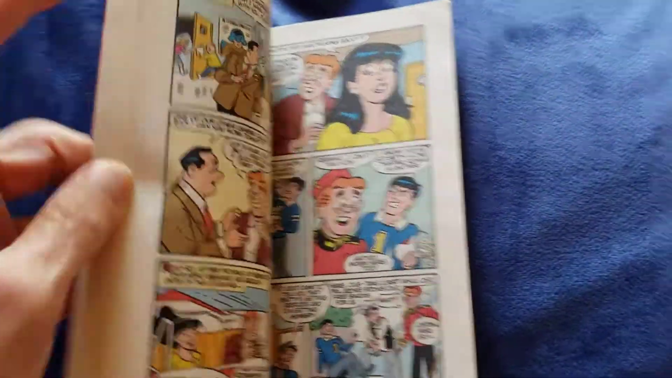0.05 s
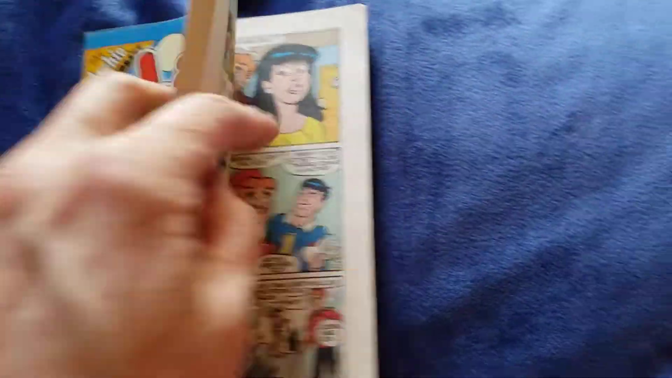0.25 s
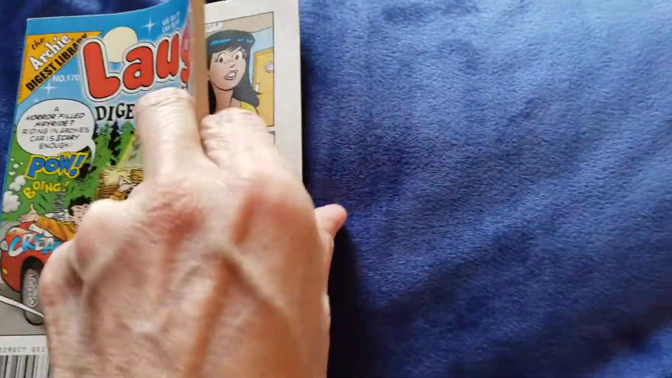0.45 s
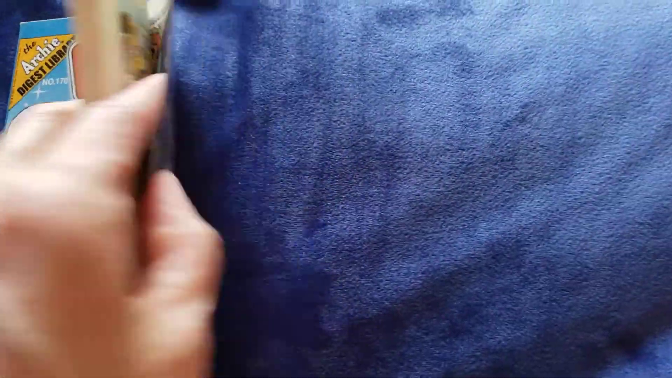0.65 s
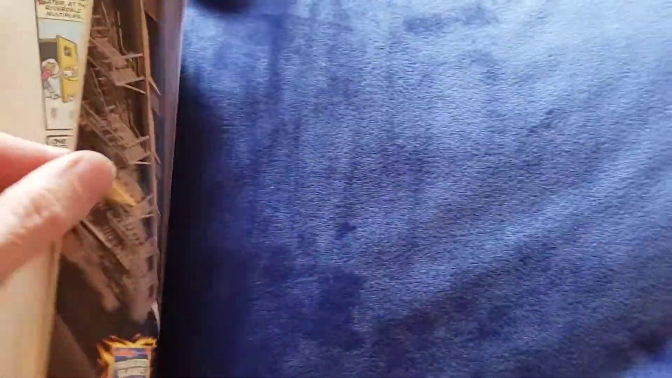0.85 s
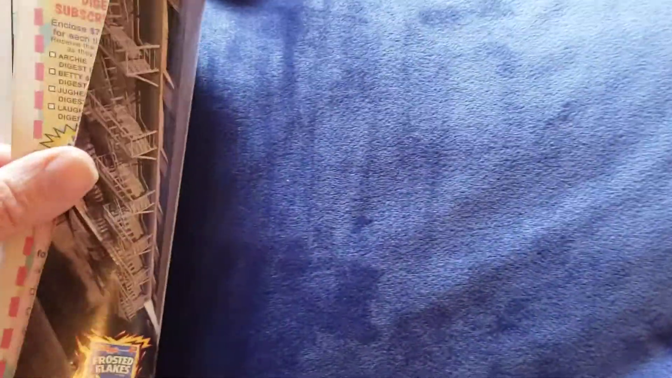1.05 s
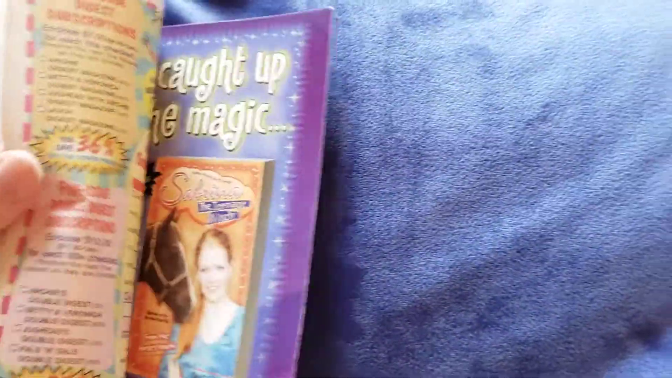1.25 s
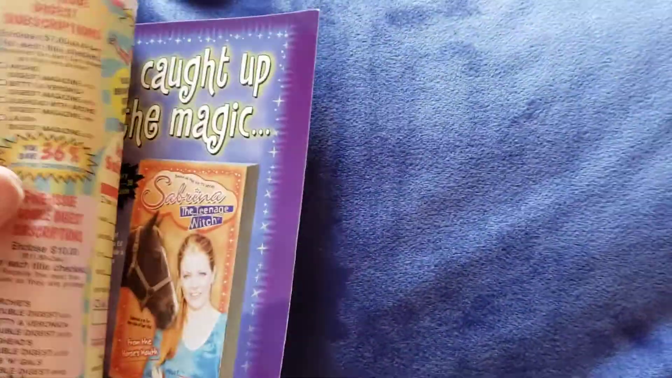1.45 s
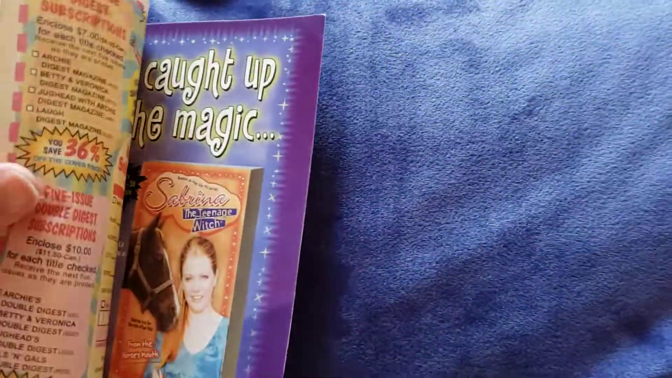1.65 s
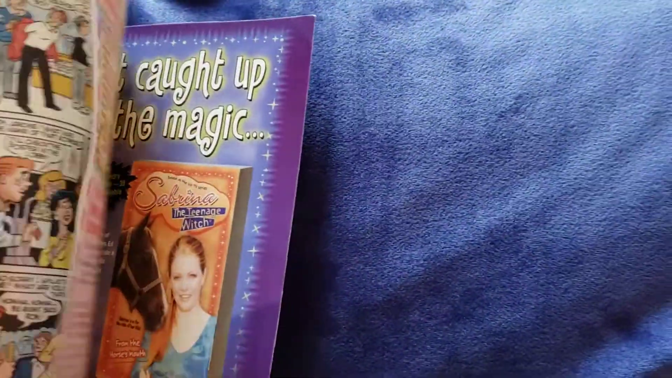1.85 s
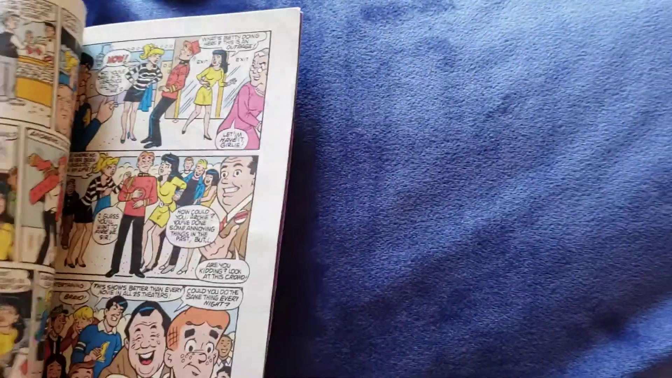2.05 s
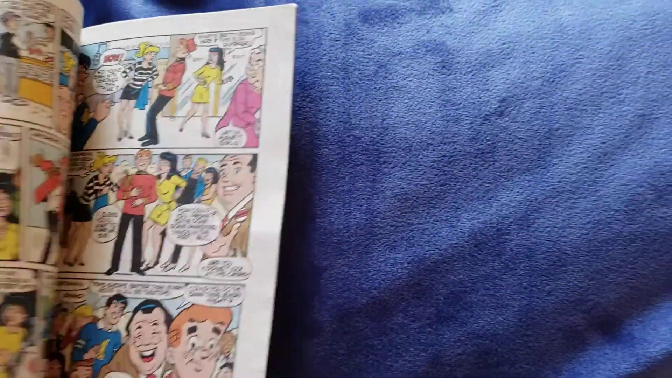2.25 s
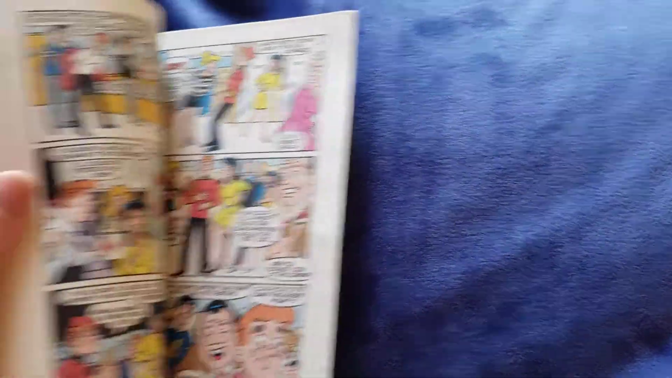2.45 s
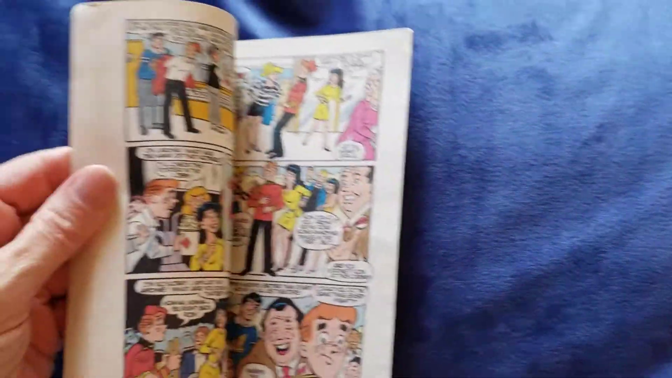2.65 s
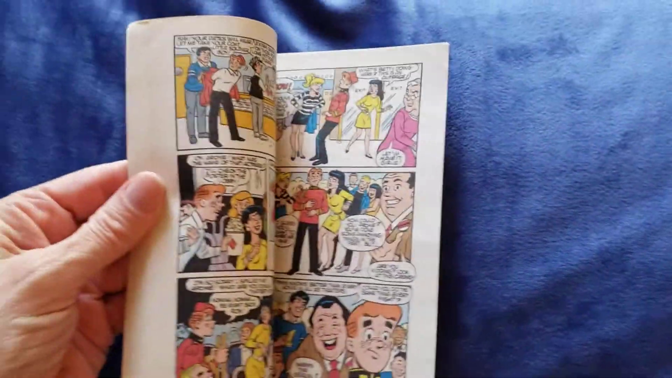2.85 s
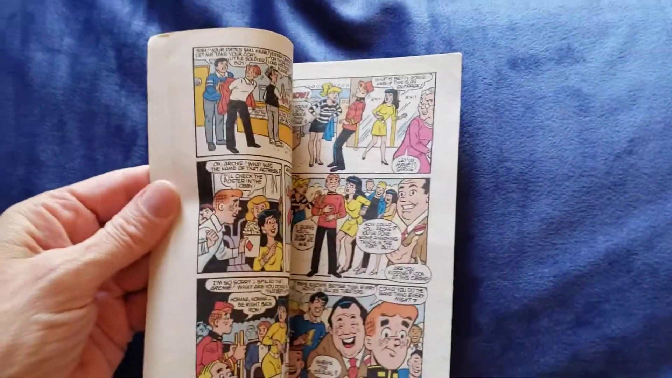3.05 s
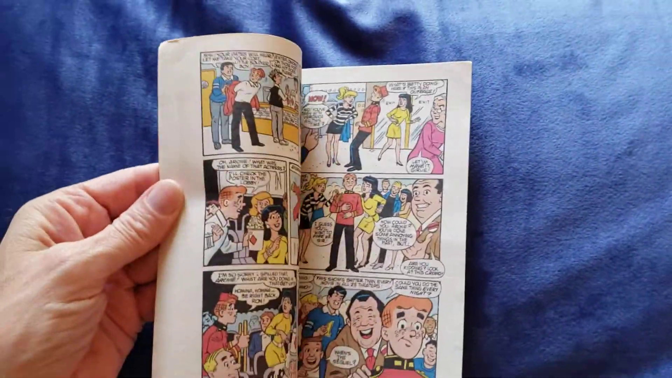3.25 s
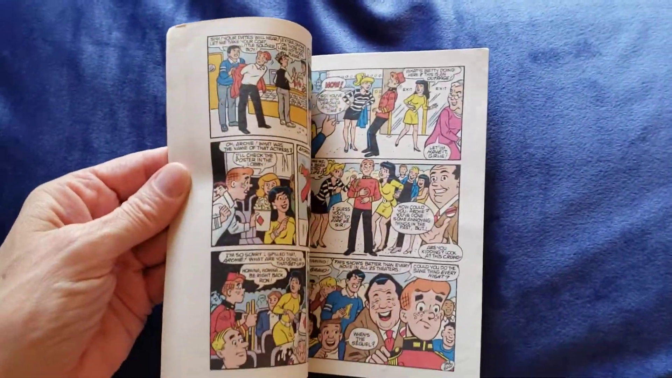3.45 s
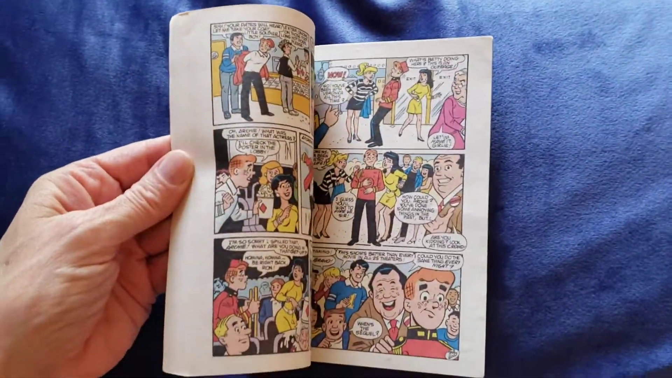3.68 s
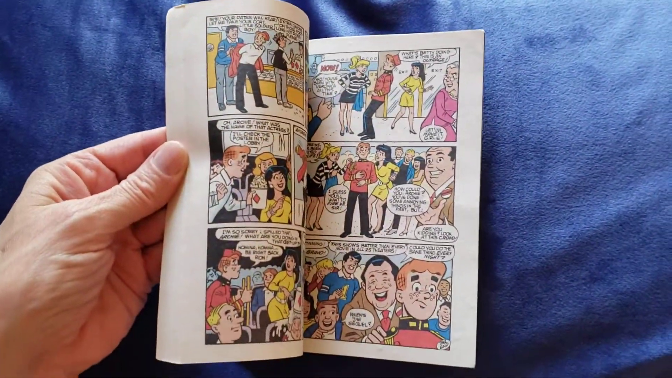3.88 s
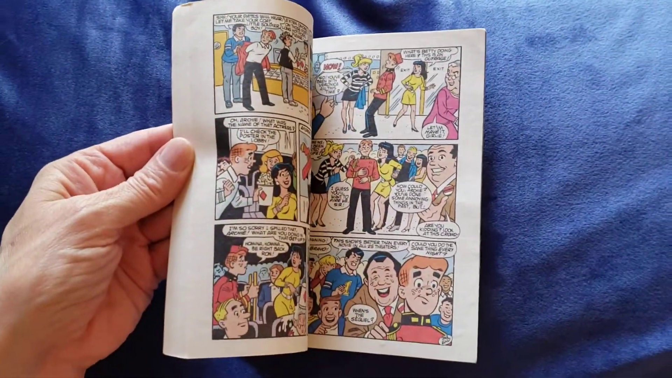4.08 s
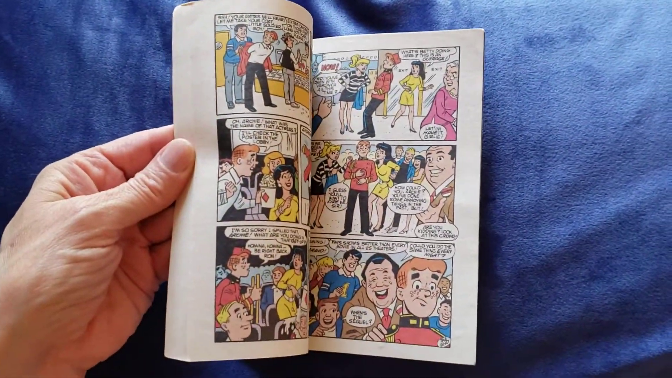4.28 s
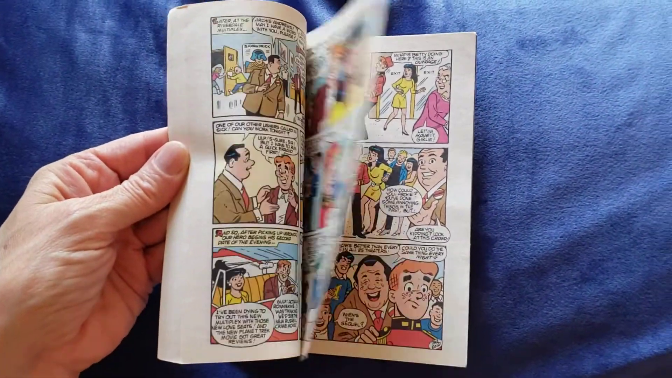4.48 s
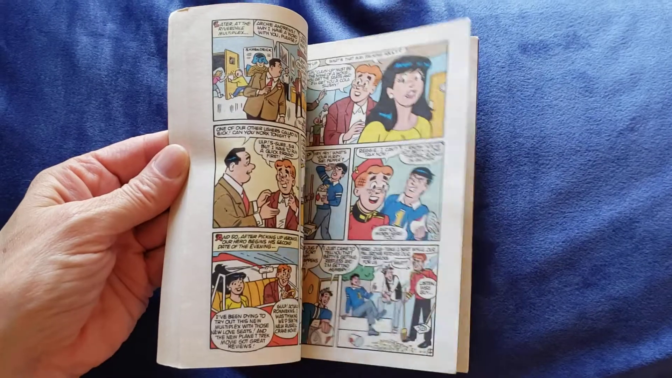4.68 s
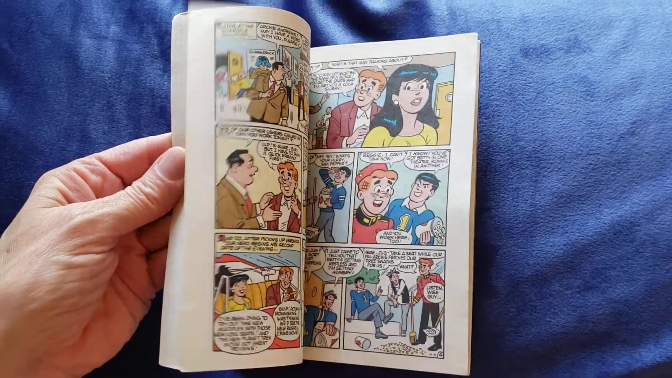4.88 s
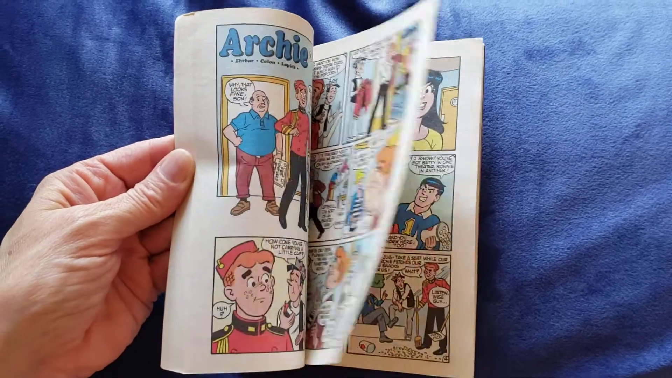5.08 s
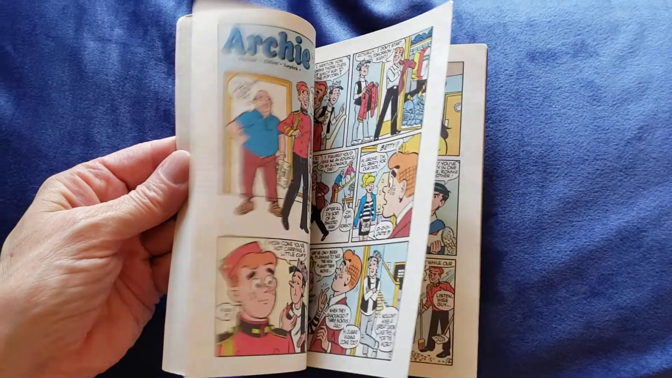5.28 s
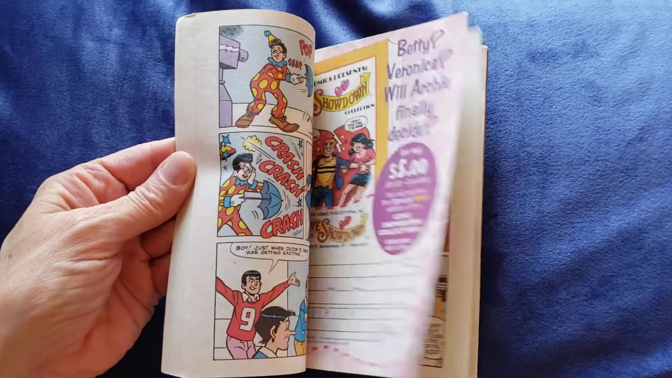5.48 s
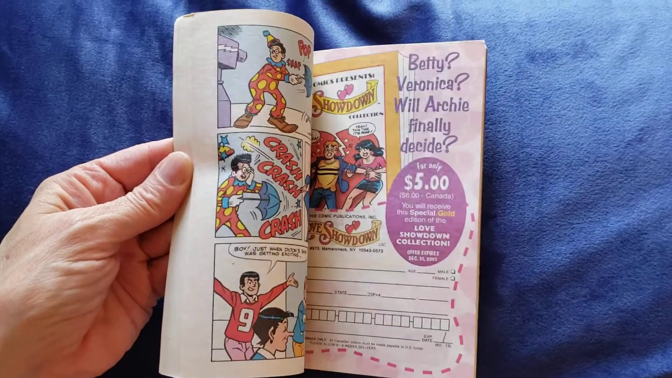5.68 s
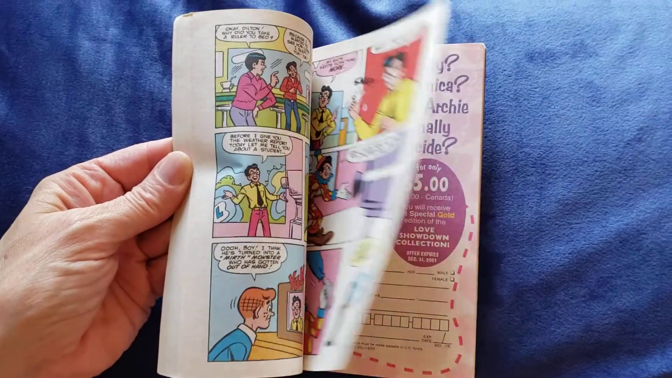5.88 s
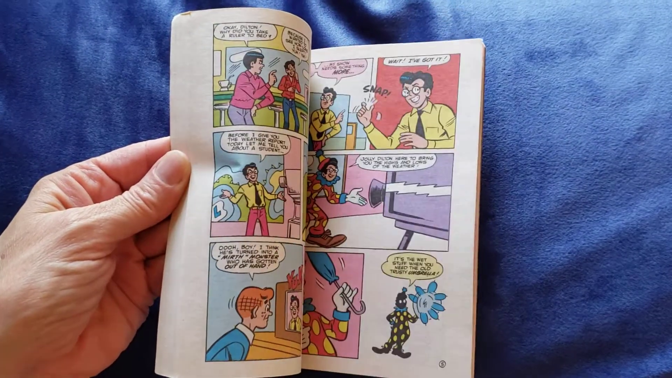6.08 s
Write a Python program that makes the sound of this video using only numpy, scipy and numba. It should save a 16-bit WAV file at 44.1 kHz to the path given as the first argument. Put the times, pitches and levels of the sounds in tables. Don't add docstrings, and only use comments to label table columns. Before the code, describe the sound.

Magazine pages are riffled and snapped close up for two seconds, then sparse soft page flicks over a quiet, faintly humming room.

```python
import sys
import numpy as np
from scipy import signal
from scipy.fft import rfft, irfft
from scipy.io import wavfile
from scipy.ndimage import uniform_filter1d
from numba import njit

SR = 44100
rng = np.random.default_rng(int(sys.argv[2]) if len(sys.argv) > 2 else 0)


def pcm_store(signal):
    levels = np.round(np.clip(np.atleast_2d(signal), -1, 1) * 32767)
    wavfile.write(sys.argv[1], SR, levels.astype(np.int16).T)


def voltage_ratio(level):
    return 10 ** (np.asarray(level, float) / 20)


N = 270333
TIME = np.arange(N) / SR
HZ = np.maximum(np.arange(N // 2 + 1) * SR / N, 1)
BELOW_HISS_TOP = HZ < 15850


def noise():
    return rng.standard_normal(N)


def unit(x):
    return x / np.sqrt(np.mean(x ** 2))


def band(x, lo_hz, hi_hz, order=2):
    low_edge = 1 + (lo_hz / HZ) ** (2 * order)
    high_edge = 1 + (HZ / hi_hz) ** (2 * order)
    return unit(irfft(rfft(x) * BELOW_HISS_TOP / np.sqrt(low_edge * high_edge), N))


def curves(rows):
    s, *columns = np.transpose(rows)
    return [np.interp(TIME, s, column) for column in columns]


def walk(rate_hz):
    hold = int(SR / rate_hz)
    steps = np.repeat(rng.standard_normal(N // hold + 1), hold)
    return unit(uniform_filter1d(steps, hold)[:N])


def pan(pan_db):
    return voltage_ratio(np.array([pan_db, -pan_db]) / 2)


@njit
def resonate(x, hz, sharp):
    y, b, l = np.empty(len(x)), 0., 0.
    for i in range(len(x)):
        g = np.tan(np.pi * hz[i] / SR)
        v = (b + g * (x[i] - l)) / (1 + g * (g + 1 / sharp))
        b, l, y[i] = 2 * v - b, l + 2 * g * v, v / sharp
    return y


def room_tone():
    # (frequency [Hz], density [dB per Hz])
    hiss_spectrum = [(25, -100), (45, -85), (90, -83.5), (160, -91), (240, -88), (400, -94.5), (560, -101),
                     (750, -107), (1500, -112), (2600, -117), (4500, -123), (8600, -131), (11000, -124),
                     (15000, -120)]
    hz, db = np.transpose(hiss_spectrum)
    colour = voltage_ratio(np.interp(np.log(HZ), np.log(hz), db)) * BELOW_HISS_TOP * np.sqrt(SR / 2)
    alike = .9 / (1 + (HZ / 600) ** 3)
    mid = rfft(noise()) * np.sqrt(1 + alike)
    side = rfft(noise()) * np.sqrt(1 - alike)
    both = np.array([irfft(colour * (mid + side), N), irfft(colour * (mid - side), N)])
    return both * voltage_ratio(np.array([[-4.2], [-1.8]]))


def hum():
    # (frequency [Hz], level [dB], left minus right [dB], wobble [dB])
    hum_lines = [(58.4, -54.5, 0, 0.85), (120, -62, 8.5, 1), (217.3, -78, 2.2, 5), (235, -71, -1, 3),
                 (262, -75.5, -1.4, 5)]
    # (frequency [Hz], level [dB])
    whine_lines = [(2480, -99), (3730, -99)]
    out = np.zeros((2, N))
    for hz, db, pan_db, wobble_db in hum_lines:
        phase = 2 * np.pi * hz * TIME + 0.36 * wobble_db * walk(6)
        line = np.sin(phase) * voltage_ratio(db + 2.5 + wobble_db * walk(9))
        out += line * pan(pan_db)[:, None]
    for hz, db in whine_lines:
        out += voltage_ratio(db) * np.sin(2 * np.pi * hz * TIME + rng.uniform(0, 6, (2, 1)))
    return out


def buffet():
    # (middle [s], level [dB], flutter [dB], half length [s])
    gusts = [(0.259, -52.5, -49.5, 0.027), (0.43, -60, -54.5, 0.11), (0.677, -66, -49, .03),
             (0.81, -54, -62, 0.078), (0.92, -51.5, -48, 0.055), (1.023, -55, -54.5, .04),
             (1.19, -69, -59, 0.056), (1.43, -64, -61.5, .06), (1.88, -69.5, -55.5, 0.043),
             (2.225, -70, -63, .05), (2.657, -64, -70.5, 0.022), (3.511, -57, -51.5, 0.027),
             (3.572, -46.5, -58.5, 0.017), (3.78, -53, -62, 0.11), (3.949, -54.5, -51.5, 0.029),
             (4.103, -61.5, -56, .04), (4.62, -62.5, -62.5, 0.082), (4.825, -61.5, -75, 0.059),
             (4.979, -57.5, -63, .05), (5.63, -54.5, -59, 0.025), (5.72, -54, -61, .03),
             (5.815, -58.5, -69, .03)]
    # (time [s], level [dB])
    left_rumble = [(0, -75), (.4, -77), (.48, -61), (.56, -76), (1.1, -69.5), (1.2, -50.5), (1.3, -65.5),
                   (1.7, -67.5), (6.13, -83.5)]
    deep_power, flutter_power = np.zeros(N), np.zeros(N)
    for s, db, flutter_db, half in gusts:
        lump = np.exp(-((TIME - s) / half) ** 2)
        deep_power += voltage_ratio(db + 10.5) ** 2 * lump
        flutter_power += voltage_ratio(flutter_db + 4) ** 2 * lump
    right = np.sqrt(deep_power) * band(noise(), 35, 80, order=4)
    right += np.sqrt(flutter_power) * band(noise(), 65, 115, order=4)
    left = voltage_ratio(curves(left_rumble)[0]) * band(noise(), 30, 70, order=4)
    smooth = signal.butter(4, 260, fs=SR, output="sos")
    return signal.sosfilt(smooth, np.array([left, right]))


def walls(x):
    t60_s, room_db = 0.25, -10
    t = TIME[:int(.5 * SR)]
    tail = rng.standard_normal((2, len(t))) * np.exp(-np.log(1000) * t / t60_s) * (t > .006)
    tail = tail / np.sqrt(np.sum(tail ** 2, axis=1, keepdims=True))
    return voltage_ratio(room_db) * signal.fftconvolve(x, tail, axes=1)[:, :N]


def flaps():
    # (time [s], level [dB], push length [s])
    puffs = [
        (1.181, -16.5, 0.0007),
        (1.254, -30.5, 0.0019),
        (0.19, -41, 0.0043),
    ]
    out = np.zeros(N)
    for s, db, length in puffs:
        u = (TIME - s) / length
        out += voltage_ratio(db) * u * np.exp(-u ** 2)
    return out


def click(t, hz, width_s):
    u = t - .0002
    return np.exp(-u ** 2 / (2 * width_s ** 2)) * np.cos(2 * np.pi * hz * u)


def snaps():
    # (time [s], peak [dB], ring [Hz], ring level [dB], sharp edge [dB])
    corners = [(0.278, -34.5, 1740, -8.5, -26), (0.626, -31.5, 1640, -14.5, -12.5),
               (0.7216, -40, 880, -14, -22), (1.087, -35, 1540, -2.5, -12), (1.1732, -29, 1980, -11, -17.5),
               (1.1911, -19, 1710, -8, -19.5), (1.1996, -27, 1650, -6, -20),
               (1.4309, -33, 1620, -1.5, -14.5), (1.6769, -29, 1610, -10.5, -11),
               (1.8363, -25.5, 2210, -21, -17), (1.8843, -44, 1570, -3, -11),
               (2.1835, -12.5, 2006, -18.5, -33.5), (2.2398, -39, 890, -6.5, -10),
               (2.2816, -39, 1000, -7.5, -12.5), (2.3357, -47, 1080, 1.5, -14),
               (3.0424, -59.5, 775, 10, -8), (3.157, -60, 1190, 0, -7), (3.2774, -62.5, 802, 10.5, -19),
               (3.4079, -61.5, 964, 7.5, -12), (4.4092, -46, 1067, -12, -16),
               (4.9101, -59.5, 1060, -6, -11), (5.306, -45, 1110, -9, -14), (5.7525, -50, 1203, -7, -11)]
    ring_t60_s = 0.011
    out, t = np.zeros(N), TIME[:int(.06 * SR)]
    crack, edge = click(t, 4300, .00008), click(t, 11000, .00004)
    for s, db, hz, ring_db, edge_db in corners:
        blow = crack + voltage_ratio(edge_db + 7.5) * edge
        echo = .28 * np.roll(blow, int(.0004 * SR))
        ring = np.sin(2 * np.pi * hz * t) + .6 * np.sin(2 * np.pi * 1.55 * hz * t)
        ring *= voltage_ratio(ring_db + 6.5) * np.exp(-np.log(1000) * t / ring_t60_s)
        out[int(s * SR):][:len(t)] += voltage_ratio(db) * (blow + echo + ring)
    return out


def at_ports(left, right):
    # (time [s], left minus right [dB], right port later by [samples])
    page_places = [(0, -4.5, -2), (.8, -2, -3.5), (.9, -1.85, 3.5), (1.14, -0.7, 5), (1.17, 0.9, 4),
                   (1.25, -0.1, 5.5), (1.33, -3.5, 7), (1.9, 0, 4.5), (2.1, 2.5, 8), (2.35, -0.4, 11),
                   (2.55, -4, 0.5), (6.13, -2.5, 0)]
    pan_db, lag = curves(page_places)
    later = np.interp(np.arange(N) - np.round(lag), np.arange(N), right)
    return np.array([left, later]) * pan(pan_db)


def port_noises():
    left = noise()
    alike = 0.5 / (1 + (HZ / 2580) ** 2)
    alike = alike + (.96 - alike) / (1 + (HZ / 800) ** 4)
    right = irfft(alike * rfft(left) + np.sqrt(1 - alike ** 2) * rfft(noise()), N)
    return left, right


def fibres(grain_db):
    return voltage_ratio(grain_db * walk(900) + .8 * walk(70))


def crease_path():
    roam = np.interp(TIME, np.arange(80) / 12, rng.standard_normal(80))
    return np.clip(3740 * np.exp(0.62 * roam), 1500, 12000)


def held(t, length):
    catch = np.clip(t / (0.00085 + 0.048 * length), 0, 1)
    return catch * np.exp(-np.clip(t - length, 0, 1) / (0.00089 + .1 * length))


def page_moves(t):
    # (time [s], peak [dB], hollow pitch [Hz], hollow [dB], crisp [dB])
    slips = [(1.087, -35.5, 1571, -3, -5), (1.1086, -35.5, 1400, 2, -1), (1.1243, -40, 1540, 3.5, -4),
             (1.172, -21.5, 2047, -7.5, -31), (1.182, -20.5, 911, 0.5, -12.5),
             (1.1917, -26, 1810, 3.5, -30.5), (1.1994, -24, 1650, 0.5, -17), (1.43, -42, 1549, -3.5, 3),
             (1.488, -38.5, 1287, -2, -3.5), (1.6, -38.5, 1670, -6, 1.5), (1.6775, -29, 2190, -6.5, -4.5),
             (1.69, -39, 1570, 6.5, -18.5), (1.7123, -30, 1872, -8, -9), (1.8834, -49, 1630, -2, -19.5),
             (2.1917, -39.5, 2130, -2, 1), (2.2792, -48.5, 900, 0, -8)]
    drags = [(0.085, -68.5, 705, 9, 1), (0.2668, -38, 775, -5, -11), (0.623, -44.5, 1800, -1, -16),
             (1.2094, -41, 2330, -4, -7), (1.3557, -39.5, 1770, -0.5, -5.5), (1.5186, -39, 1600, -10, 3),
             (1.629, -36, 2430, -12, -1.5), (2.459, -62, 1090, 1, -8), (2.4947, -56.5, 901, 4, -4)]
    sweeps = [(0.7224, -46, 896, -13, -9), (0.9, -57.5, 1600, 10, 5), (.957, -49, 1699, 6, -3),
              (1.012, -44.5, 1614, 2.5, -4), (2.203, -42, 850, -10.5, 4), (2.903, -66.5, 1700, -2, -3)]
    flicks = [(3.0435, -61, 740, 14.5, -5), (3.1572, -66, 1102, 13, -1), (3.2765, -62, 841, 13, 0.5),
              (3.4077, -67.5, 1050, 14, -3), (4.4068, -53.5, 1060, -2.5, 0.5), (4.9067, -59.5, 1204, 6, -4),
              (5.3028, -51.5, 1090, 1, -3.5), (5.7518, -53.5, 1150, 3.5, 3)]
    # (time [s], peak [dB], hollow pitch [Hz], crisp [dB], length [s])
    brushes = [(0.172, -57, 800, -37, 0.1), (0.3, -60.5, 1499, 0.5, 0.064), (0.788, -53.5, 1607, -8, 0.058),
               (0.873, -56.5, 1606, -28, .045), (1.242, -43.5, 2000, 0.5, 0.035),
               (1.329, -50, 1707, -29, 0.03), (1.555, -43.5, 1609, -13, 0.0095),
               (1.721, -39.5, 2293, -3, 0.082), (1.843, -47.5, 1900, -12, 0.0087),
               (1.892, -48.5, 1797, -18, 0.0061), (1.93, -52, 3500, -6, 0.14), (2.03, -57.5, 848, -10, .04),
               (2.152, -56, 785, -5, 0.021), (2.272, -54, 1000, -7.5, 0.12)]
    swells = [(0.233, -39, 850, -20, 0.039), (0.598, -45, 1600, -2.5, 0.027),
              (1.159, -27.5, 1600, -11.5, 0.014), (1.803, -32, 2437, -10, .037),
              (4.398, -56, 1000, 0, .005)]
    moves = []
    for rows, length in [(slips, 0.0052), (drags, .03), (sweeps, 0.058)]:
        moves += [(row, held(t, length)) for row in rows]
    for s, db, hz, crisp_db, length in brushes:
        moves.append(((s, db, hz, -2.5, crisp_db), held(t, length)))
    for s, db, hz, crisp_db, length in swells:
        moves.append(((s, db, hz, -3.5, crisp_db), (t / length) ** 3 * (t < length)))
    scrape = np.sin(np.pi * np.clip(t / .0045, 0, 1))
    rustle = voltage_ratio(-6.5) ** 2 * np.exp(-t / 0.02)
    for row in flicks:
        moves.append(((*row[:4], row[4] + 7.5), scrape))
        moves.append((row, rustle))
    return sorted(moves, key=lambda move: move[0][0])


def drag():
    # (time [s], pressure [dB], pocket opening [dB])
    rubbing = [(0, -86, 0.5), (.15, -81, 11), (.3, -73, 6.5), (.5, -77.5, -1), (.65, -67.5, 2),
               (.8, -69, 0.5), (.98, -59.5, 0.5), (1.1, -62.5, 5.5), (1.22, -62, 3), (1.32, -75, 5),
               (1.46, -72, 6), (1.7, -55, 3.5), (1.87, -69, -3), (2.1, -73, 5.5), (2.27, -59.5, -6),
               (2.4, -71, 3.5), (2.55, -93, 12), (6.13, -99, 9.5)]
    # (time [s], peak [dB], length [s])
    whistles = [(.9, -54, .17), (1.707, -57.5, .14)]
    press_db, open_db = curves(rubbing)
    power = voltage_ratio(np.array([press_db, press_db + open_db, press_db - 14, press_db - 14.5])) ** 2
    for s, db, length in whistles:
        power[2] += voltage_ratio(db) ** 2 * np.sin(np.pi * np.clip((TIME - s) / length, 0, 1))
    t = TIME[:int(.2 * SR)]
    hollow_hz = np.full(N, 1500.)
    for (s, db, hz, hollow_db, crisp_db), shape in page_moves(t):
        i = int(s * SR)
        layer_db = np.array([0, hollow_db + 5.5, crisp_db - 4.5, crisp_db + 0.5])
        power[:, i:i + len(t)] += voltage_ratio(db - 10.5 + layer_db)[:, None] ** 2 * shape
        hollow_hz[i:] = hz
    bend = voltage_ratio(1.8 * np.array([walk(30) for _ in power]))
    hollow_hz = uniform_filter1d(hollow_hz, size=200) * np.exp(0.038 * walk(25))
    return np.sqrt(np.abs(power)) * bend, hollow_hz


def sheets(catch, strength, hollow_hz, crease_hz):
    sharp_ring = unit(resonate(catch, hollow_hz, 4.))
    broad_ring = unit(resonate(catch, 1.3 * hollow_hz, 1.5))
    pocket = unit(sharp_ring + 0.61 * broad_ring)
    crease = voltage_ratio(-2.5) * unit(resonate(catch, crease_hz, 2.5))
    face = 0.58 * (band(catch, 2300, 5600, order=3) + crease)
    face += voltage_ratio(-15) * band(catch, 450, 1000, order=3)
    whistle = band(catch, 6300, 8300, order=4)
    crackle = band(catch, 9600, 20000, order=3)
    mix = np.sum(strength * [face, pocket, whistle, crackle], axis=0)
    return irfft(rfft(mix) * BELOW_HISS_TOP, N)


def scene():
    strength, hollow_hz = drag()
    grain, crease_hz = fibres(grain_db=2.4), crease_path()
    hits = snaps() + flaps()
    ports = []
    for texture in port_noises():
        ports.append(0.94 * sheets(grain * texture, strength, hollow_hz, crease_hz) + hits)
    paper = at_ports(*ports)
    return paper + walls(paper) + hum() + room_tone() + buffet()


def roll_off(x):
    return signal.sosfilt(signal.butter(12, 16860, fs=SR, output="sos"), x)


def record(dry):
    low_cut = signal.butter(2, 30, "highpass", fs=SR, output="sos")
    mix = signal.sosfilt(low_cut, dry)
    return roll_off(mix)


dry = scene()
out = record(dry)
pcm_store(out)
```